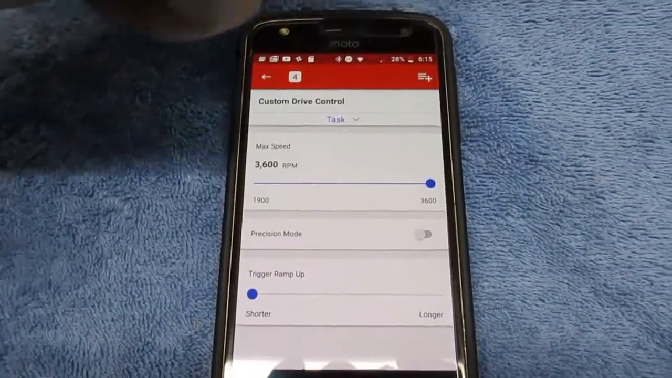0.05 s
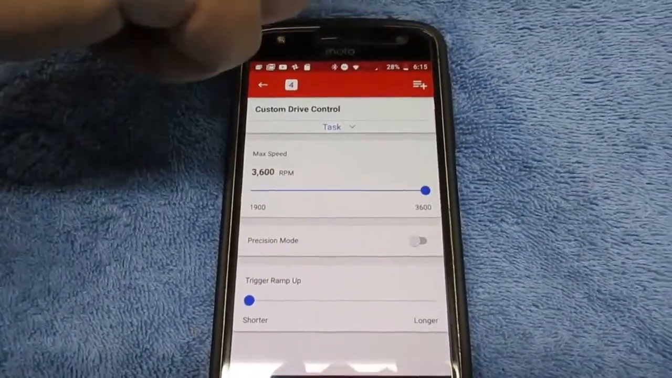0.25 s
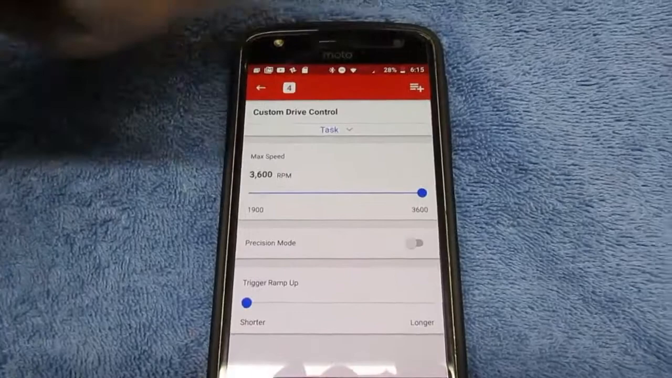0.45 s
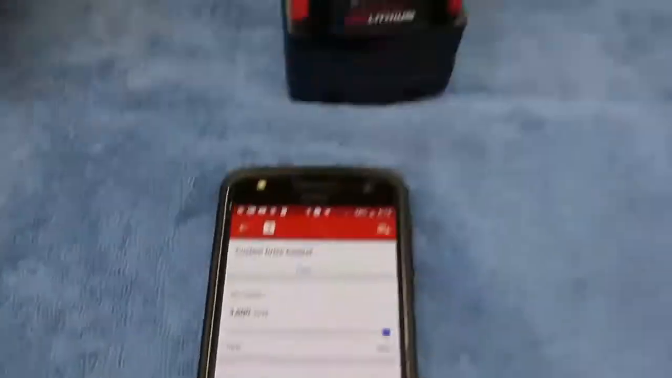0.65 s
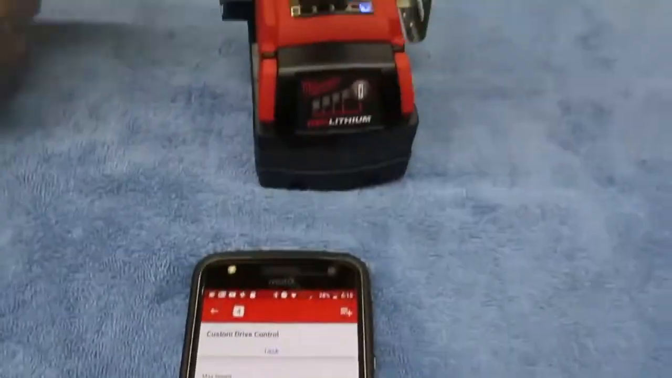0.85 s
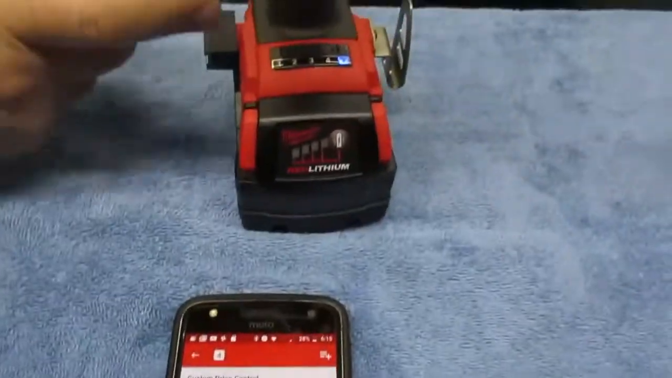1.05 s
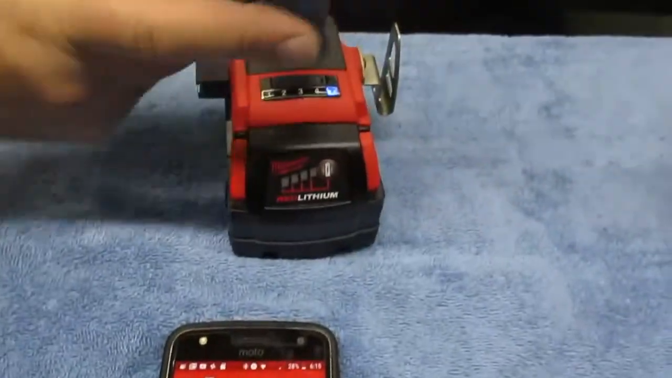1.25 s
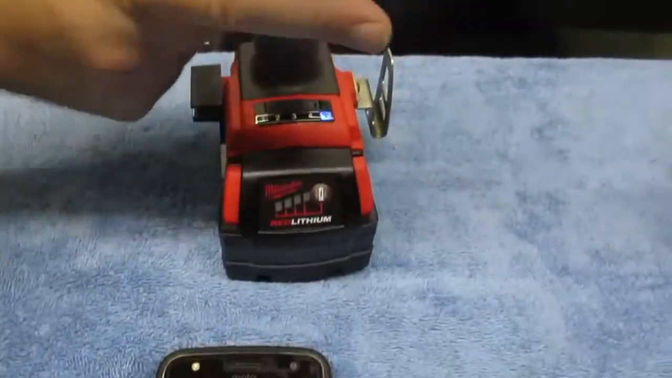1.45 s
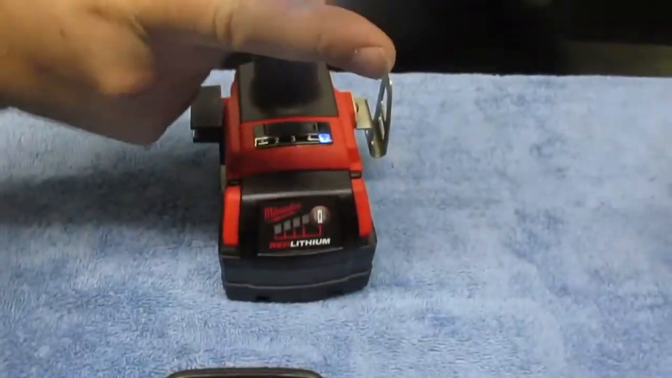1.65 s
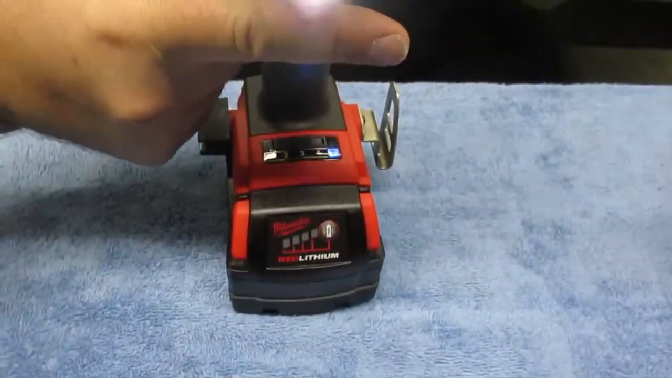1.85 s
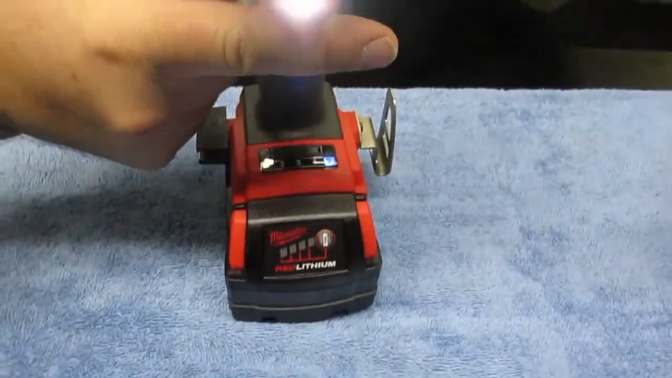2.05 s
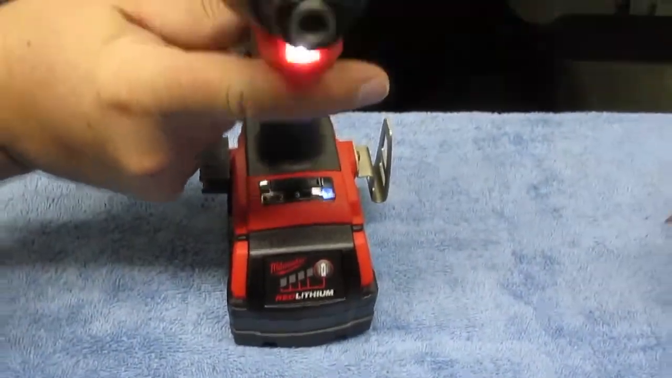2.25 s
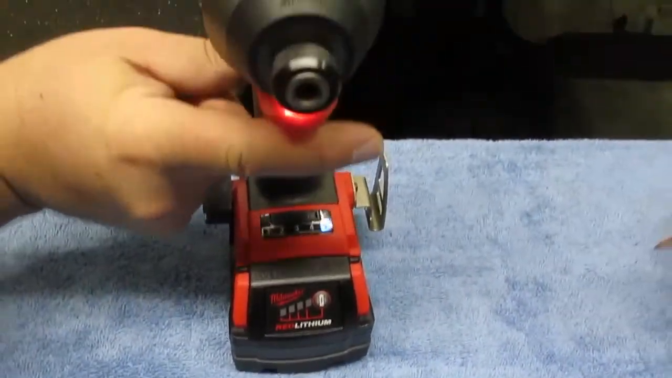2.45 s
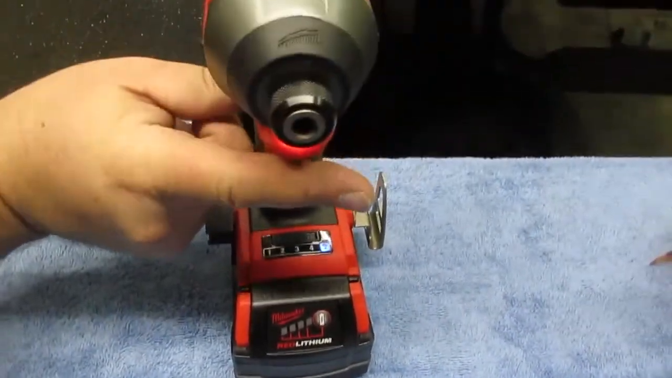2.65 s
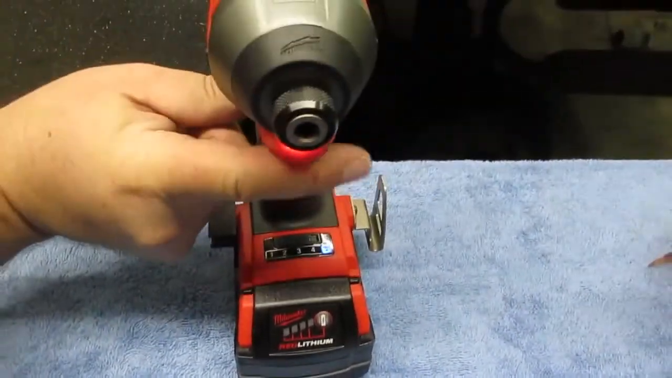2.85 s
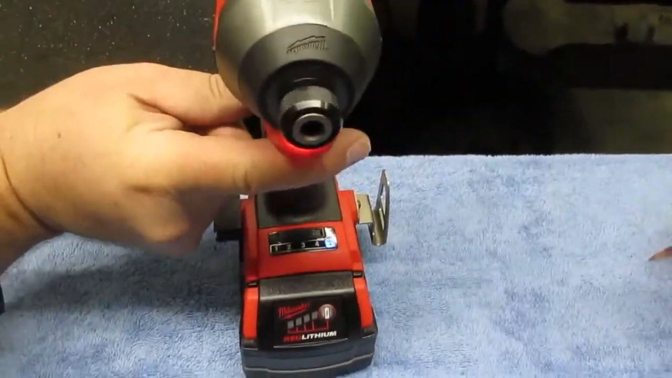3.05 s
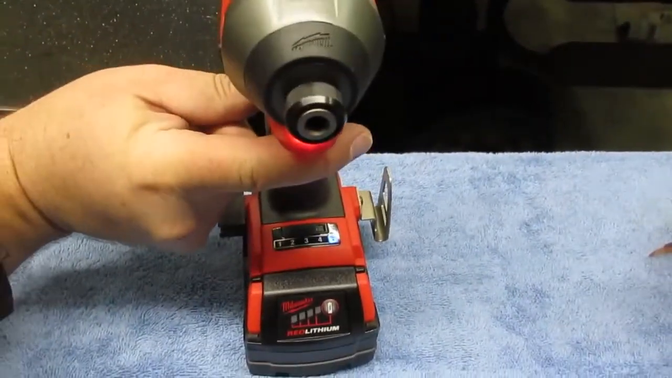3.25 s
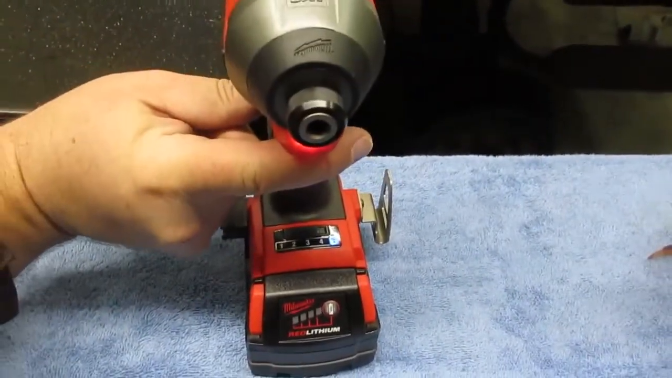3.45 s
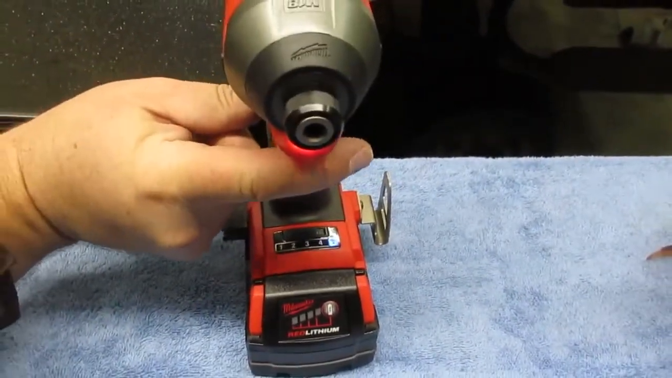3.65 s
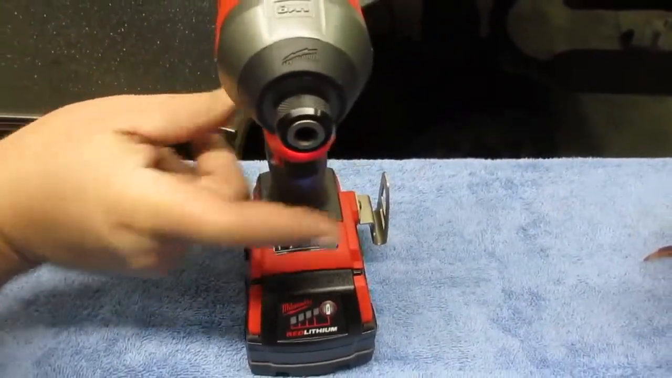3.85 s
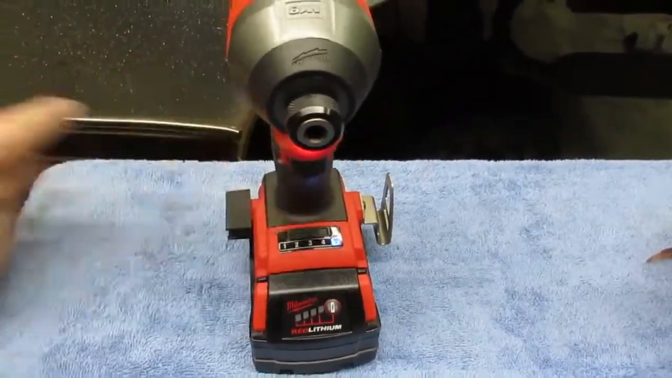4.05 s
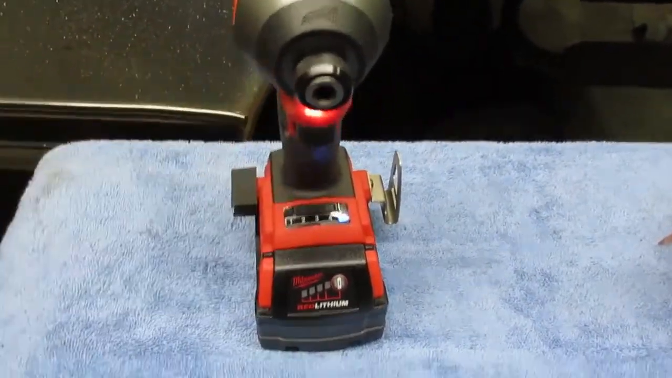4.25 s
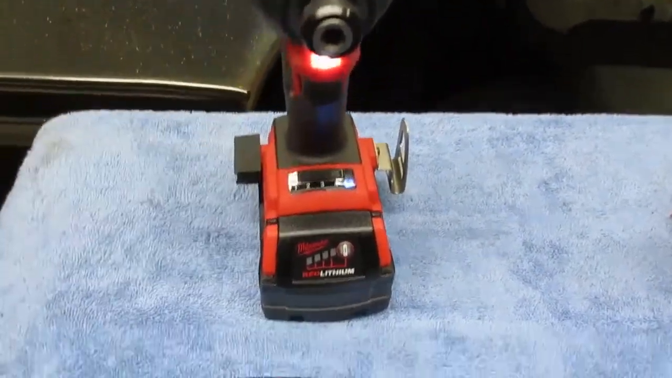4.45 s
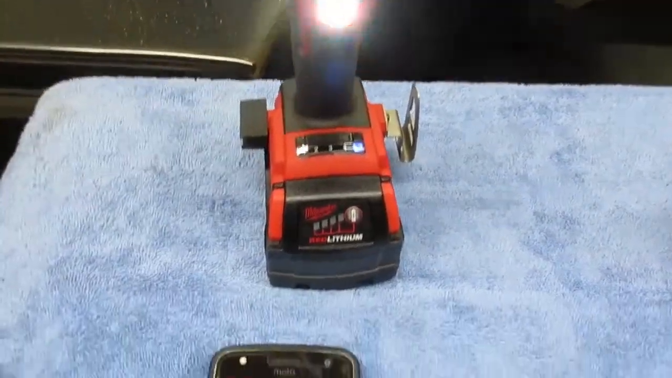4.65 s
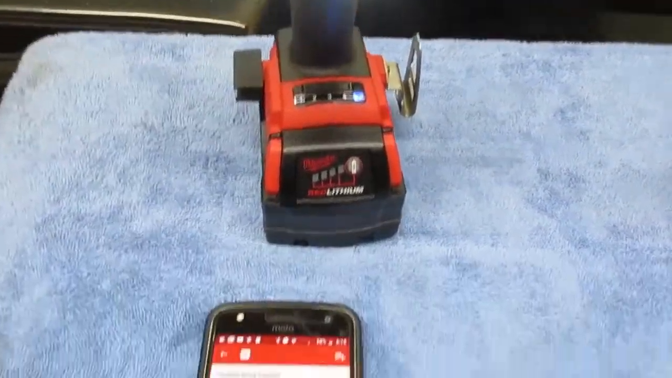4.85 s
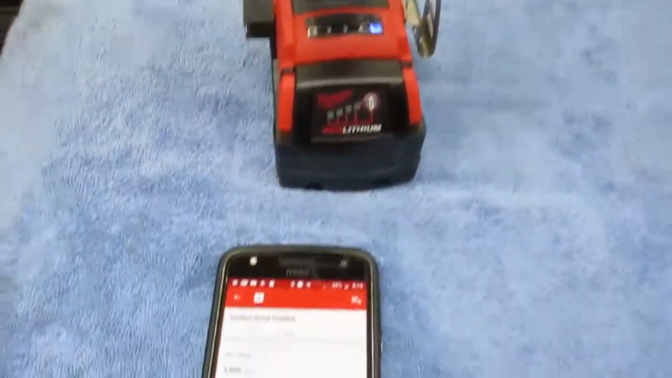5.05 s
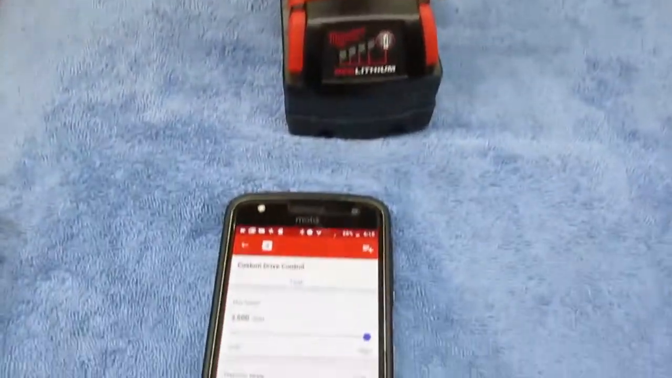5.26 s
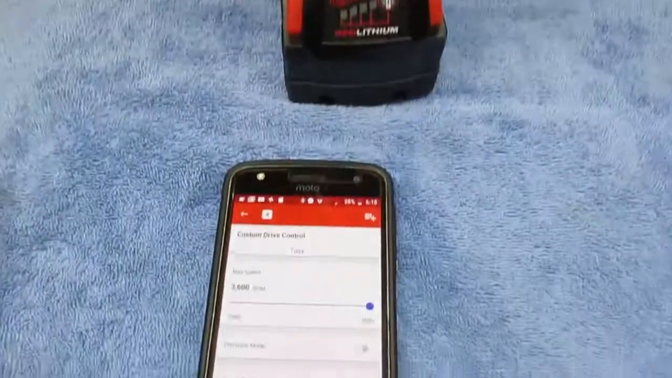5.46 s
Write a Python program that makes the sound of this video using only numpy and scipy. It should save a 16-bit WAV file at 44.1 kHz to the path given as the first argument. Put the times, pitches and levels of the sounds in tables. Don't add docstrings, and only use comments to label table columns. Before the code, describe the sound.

A quiet workshop heard through a close camera microphone: a faint low fan hum around 240 Hz, soft room hush, and tiny rubs of hands or cloth at about 0, 0.2, 0.6 and 1.6 seconds. At 1.86 a trigger tick is followed by a very sharp, loud plastic crack near 1.92. The cordless driver spins up within about 0.15 seconds to a steady high whine near 3 kHz, with gritty gear rattle in plastic and metal shells and rushing air. Released at 2.6, it glides down and stops by 2.75. Lighter clicks at 3.0 to 3.07 start a second run, its spin-up brighter, held until 3.83 and halted by about 3.98. Nothing is driven, so there is no hammering. The background is turned down by the runs and gradually returns, with faint distant drones, a soft low bump at 4.7 and small rubs until 5.6.

```python
import sys
import numpy as np
from scipy import signal
from scipy.fft import rfft, irfft
from scipy.io import wavfile
from scipy.ndimage import uniform_filter1d

SR = 44100
rng = np.random.default_rng(int(sys.argv[2]) if len(sys.argv) > 2 else 0)


def invert_db(level):
    return 10 ** (np.asarray(level, dtype=float) / 20)


def wav_out(sig):
    wavfile.write(sys.argv[1], SR, np.round(np.clip(np.atleast_2d(sig).T, -1, 1) * 32767).astype(np.int16))


N = 242574
TIME = np.arange(N) / SR
FULL_HZ = 410.75
SPINDLE = 0.118
LOCK_AFTER_S = 0.145
DUCK_DB = -10

# pressed_s, released_s, housing_ring_db, gear_case_ring_db, spin_up_extra_whine_db
TRIGGER_PULLS = [
    (1.912, 2.605, -19, -23.5, -2),
    (3.064, 3.832, -21.5, -23.5, 3),
]


def unit(x):
    return x / np.sqrt(np.mean(x ** 2))


def ring(x, hz, width):
    return signal.lfilter(*signal.iirpeak(min(hz, 0.45 * SR), max(hz / width, 0.3), fs=SR), x)


def body(x, modes):
    out = 0
    for k, (hz, width, db) in enumerate(modes):
        mode = unit(ring(ring(x, hz, 1.05 * width), hz, 1.05 * width))
        out = out + invert_db(db) * mode * (-1) ** k
    return unit(out)


def narrow_noise(hz, width):
    return unit(ring(ring(rng.standard_normal(N), hz, width), hz, 2 * width))


def coloured(spectrum):
    hz, db = np.transpose(spectrum)
    f = np.maximum(np.arange(N // 2 + 1) * SR / N, 1)
    colour = invert_db(np.interp(np.log(f), np.log(hz), db))
    return unit(irfft(rfft(rng.standard_normal(N)) * colour, N))


def walk(rate):
    k = int(SR / rate)
    steps = np.repeat(rng.standard_normal(N // k + 1), k)
    return unit(uniform_filter1d(uniform_filter1d(steps, k), k)[:N])


def span(t0, t1, edge):
    return np.clip((TIME - t0) / edge, 0, 1) * np.clip((t1 - TIME) / edge, 0, 1)


def driver():
    # housing_db, gear_case_db, air_db
    driven_loss = (7.1, 3.4, 5.2)
    # housing_db, gear_case_db, air_db
    braked_loss = (5.1, 10.2, 18.6)
    # time_s, aim (-1.4 to 1.4)
    chuck_aim = [(2.03, 0.7), (2.09, -0.7), (2.2, -1.4), (2.4, -0.14), (2.6, 0.45), (3.2, 1.4),
                 (3.45, 0.46), (3.65, 0.4), (3.85, 0.69)]
    hz, on, braking, levels = rotor()
    turn = 2 * np.pi * np.cumsum(hz) / SR
    slow = 1 - np.clip(hz / FULL_HZ, 0, 1)
    halvings = np.minimum(np.log2(FULL_HZ / hz), 2.4)
    loss = np.outer(driven_loss, 1 - braking) + np.outer(braked_loss, braking)
    housing_db, case_db = levels[:2] - loss[:2] * halvings
    air_db = -20 - loss[2] * halvings
    effort_db = levels[2] * (1 - braking) * np.minimum(12 * halvings, 1)
    aim = np.interp(TIME, *np.transpose(chuck_aim))

    beat = gear_beat(turn, slow)
    rattle = gear_rattle(beat, housing_db, case_db + 0.8 * effort_db * slow)
    hiss = air_hiss(beat, air_db)
    whine = tooth_whine(turn, slow, aim) + pole_whine(hz, turn, slow, braking, effort_db)
    whine = whine + flares(hz, turn, braking, effort_db) + weak_orders(hz, turn, slow)
    whine = whine + unbalance(hz, turn, slow)
    return on * invert_db(camera_db() - DUCK_DB) * (rattle + hiss + np.sqrt(2) * whine)


def rotor():
    spin_up_s, settle_s = 0.065, 0.14
    coast_hz_per_s, brake_after_s, brake_hz_per_s2 = 690, 0.066, 27500
    hz, on, braking, levels = np.zeros(N), np.zeros(N), np.zeros(N), np.zeros((3, N))
    for pressed, released, *db in TRIGGER_PULLS:
        age, since = np.maximum(TIME - pressed, 0), np.maximum(TIME - released, 0)
        up = FULL_HZ * (1 - np.exp(-age / spin_up_s - (age / settle_s) ** 2))
        down = coast_hz_per_s * since + brake_hz_per_s2 * np.maximum(since - brake_after_s, 0) ** 2
        hz += np.maximum(up - down, 0)
        start = np.clip((TIME - pressed) / 0.002 + 0.5, 0, 1)
        on += start * np.exp(-np.maximum(since - LOCK_AFTER_S, 0) / 0.0092)
        braking += np.clip(since / 0.044, 0, 1) * (up > down)
        levels[:, TIME >= pressed - 0.01] = np.array(db)[:, None]
    return np.maximum(hz, 30), on, braking, levels


def gear_beat(turn, slow):
    planet = 0.074
    wobble = sum(np.cos(k * share * turn) for share in (SPINDLE, planet) for k in (1, 2))
    return invert_db(8.5 * slow * np.cos(turn) + 0.91 * wobble + 0.574 * walk(150))


def gear_rattle(beat, housing_db, case_db):
    # pitch_hz, width_hz, level_db
    housing_modes = [(1550, 150, -3.5), (1680, 136, 2), (1810, 63, 1), (1855, 117, -0.5),
                     (2074, 170, -11.5), (1250, 120, -13), (832, 230, -12.5)]
    # pitch_hz, width_hz, level_db
    case_modes = [(2988, 970, 2.5), (3545, 214, -6), (3653, 270, -6.5), (5050, 990, -7.5)]
    knocks = rng.standard_normal(N) * invert_db(2.66 * rng.exponential(size=N)) * beat
    knocks = unit(knocks) + 0.54 * rng.standard_normal(N)
    housing = invert_db(housing_db + 2 * walk(30)) * body(knocks, housing_modes)
    case = invert_db(case_db + 1.5 * walk(60)) * body(knocks, case_modes)
    return housing + case


def air_hiss(beat, air_db):
    # pitch_hz, level_db (per Hz)
    air_colour = [(290, -34.5), (500, -22), (1380, -10), (1660, -9), (2270, -10.5), (3070, -21.5),
                  (3340, -9.5), (4320, -13), (5210, -13.5), (5920, -16), (8580, -14), (15200, -27.5)]
    return invert_db(air_db) * coloured(air_colour) * invert_db(0.25 * walk(200)) * np.sqrt(beat)


def tooth_whine(turn, slow, aim):
    octave_db = -44 - 90 * slow ** 2 - 5.5 * aim
    octave = invert_db(octave_db + 1.2 * walk(40)) * np.sin(26 * turn + 0.5 * walk(20))
    tooth_db = -32.5 - 200.5 * slow ** 2 + 5.5 * aim
    tooth = invert_db(tooth_db + 1.5 * walk(40)) * np.sin(13 * turn + 0.25 * walk(20))
    return octave + tooth * (slow < 0.2)


def pole_whine(hz, turn, slow, braking, effort_db):
    # multiple of rotor speed, level_db on the gear-case ring, braking_loss_db
    pole_line = (8, -18.5, 8.1)
    # pitch_hz, gain_db
    shell_path = [(300, -60), (1300, -36), (1720, -11), (2250, -35), (2700, -18), (2880, -2), (3120, 0),
                  (3290, -4.5)]
    order, db, braked_db = pole_line
    path_db = np.interp(order * hz, *np.transpose(shell_path))
    pole_db = db + path_db - braked_db * braking + effort_db
    return invert_db(pole_db + (1.3 + 7 * slow) * walk(40)) * np.sin(order * turn + 0.25 * walk(20))


def flares(hz, turn, braking, effort_db):
    # multiple of rotor speed, ring_hz, width_hz, level_db, braking_loss_db
    ring_crossings = [(13, 2980, 270, -17, 4), (6.277, 1740, 150, -21, 3), (21, 3000, 300, -27, 15),
                      (16.82, 3000, 300, -25, 15), (11, 3050, 250, -25, 15)]
    out = 0
    for order, ring_hz, width, db, braked_db in ring_crossings:
        crossing = np.exp(-((order * hz - ring_hz) / width) ** 2)
        flare_db = db - braked_db * braking + effort_db + 2.5 * (1 - braking) * walk(250)
        jitter = (0.7 - 0.5 * braking) * walk(200)
        out = out + invert_db(flare_db) * crossing * np.sin(order * turn + jitter)
    return out


def weak_orders(hz, turn, slow):
    line_orders = (.882, 2, 3, 4, 4.52, 5, 6.277, 12.55, 16.82, 21, 36)
    line_levels = (-56, -50, -48, -27, -29, -43, -41, -41, -48, -47, -52)
    out = 0
    for order, db in zip(line_orders, line_levels):
        glide_db = shell(order * hz) - shell(order * FULL_HZ) - 40 * slow
        out = out + invert_db(db + glide_db + 2.5 * walk(30)) * np.sin(order * turn + 0.45 * walk(20))
    return out


def shell(hz):
    # pitch_hz, gain_db
    shell_gain = [(100, -50), (1300, -36), (1600, -22), (2500, -22), (2800, 3), (3000, 7), (3300, 0.1),
                  (4300, -3), (15000, 0.1)]
    return np.interp(hz, *np.transpose(shell_gain))


def unbalance(hz, turn, slow):
    # pitch_hz, width_hz, level_db
    grip_mode = (378, 16, -47)
    grip_hz, width, grip_db = grip_mode
    grip = invert_db(grip_db) * np.sin(turn) / (1 + ((hz - grip_hz) / width) ** 2)
    chuck = SPINDLE * turn
    chuck_wave = np.sin(chuck) + 0.087 * np.sin(2 * chuck) + 0.29 * np.sin(3 * chuck)
    return grip + invert_db(-51 - 35 * slow) * chuck_wave


def trigger():
    # time_s, peak_db, ring_hz, ring_s, thump_db (relative)
    clicks = [
        (1.8606, -14, 5200, .024, -16),
        (1.9127, -3, 6500, .02, -12),
        (1.9208, 4.5, 9500, .012, -20),
        (2.989, -41, 9000, .012, -15),
        (3.0098, -25, 5500, .018, -28),
        (3.0575, -32, 9000, .01, -6),
        (3.0633, -10, 10000, .012, -12),
        (3.0706, -8, 11000, .012, -14),
    ]
    out, t = np.zeros(N), np.arange(SR // 20) / SR
    for s, db, hz, ring_s, thump_db in clicks:
        strike = rng.standard_normal(len(t)) + 5 * (t == t[2])
        decay = np.exp(-t / 0.00022) + 0.14 * invert_db(-60 * t / ring_s)
        crack = ring(ring(strike, hz, 1.2 * hz), hz, 1.2 * hz) * decay
        crack = signal.lfilter(*signal.butter(4, 12000, fs=SR), crack)
        thump = np.sin(2 * np.pi * 1700 * t) * np.exp(-t / 0.00087)
        thump = thump + 1.2 * np.sin(2 * np.pi * 3000 * t) * np.exp(-t / 0.0015)
        i = int(s * SR)
        out[i:i + len(t)] += invert_db(db) * (crack / np.abs(crack).max() + invert_db(thump_db) * thump)
    return out


def chopper():
    # start_s, end_s, pitch_hz, level_db
    chopper_tones = [
        (1.8995, 1.93, 7950, -42),
        (3.049, 3.08, 7950, -46),
    ]
    out = 0
    for t0, t1, hz, db in chopper_tones:
        out = out + invert_db(db) * span(t0, t1, 0.0011) * np.sin(2 * np.pi * hz * TIME)
    return out


def room(x):
    t60_s, tail_db = 0.18, -20
    t = np.arange(SR // 2) / SR
    tail = ring(rng.standard_normal(len(t)), 3500, 7700) * invert_db(-60 * t / t60_s) * (t > 0.004)
    return x + invert_db(tail_db) * signal.fftconvolve(x, tail / np.sqrt(np.sum(tail ** 2)))[:N]


def hands():
    # time_s, peak_db, pitch_hz, length_s
    touches = [(0, -49, 6500, .03), (.178, -46, 4400, .014), (.64, -50.5, 5800, .016),
               (1.63, -52, 4200, .018), (1.868, -50, 7000, .015), (4.255, -59, 9000, .012),
               (4.68, -42, 85, .03), (4.12, -64, 8000, .01), (4.64, -63, 5500, .02),
               (4.835, -58, 10000, .07), (5.245, -60, 6000, .03)]
    out = 0
    for s, db, hz, length in touches:
        age = np.maximum(TIME - s, 0) / length
        scrape = unit(ring(ring(rng.standard_normal(N), hz, 0.6 * hz), hz, 0.8 * hz))
        out = out + invert_db(db + 2.5 * walk(120)) * np.minimum(5 * age, 1) * np.exp(-age) * scrape
    return out


def shop():
    # pitch_hz, width_hz, level_db
    fan_modes = [(240.1, 13.6, -37), (311, 24, -47.5), (171.6, 71, -51), (389, 71, -51), (54, 11, -64.5),
                 (768, 194, -56)]
    # pitch_hz, level_db (per Hz)
    hush_colour = [(18, -72), (30, -26), (81, -23.5), (176, -17), (212, -12.5), (241, -5.5), (439, -15.5),
                   (759, -13.5), (911, -19.5), (1840, -22.5), (4710, -37), (10300, -42), (15200, -52)]
    hum = sum(invert_db(db) * narrow_noise(hz, width) for hz, width, db in fan_modes)
    hush = invert_db(-40 + 0.66 * walk(15)) * coloured(hush_colour)
    return (hum + hush) * invert_db(camera_db())


def far_machines():
    # start_s, end_s, pitch_hz, width_hz, level_db
    far_drones = [
        (0, .35, 450, 25, -53),
        (.9, 1.45, 3300, 200, -60),
        (4.07, 4.45, 442, 10, -55),
        (5.41, 5.6, 445, 10, -49),
        (5.06, 5.11, 13700, 500, -76),
        (5.15, 5.25, 13600, 500, -76),
    ]
    out = 0
    for t0, t1, hz, width, db in far_drones:
        out = out + invert_db(db) * span(t0 - 0.02, t1, 0.012) * narrow_noise(hz, width)
    return out


def camera_db():
    rest_db, duck_s, recover_s = 0.62, 0.054, 2.5
    db = np.full(N, rest_db)
    for pressed, released, *_ in TRIGGER_PULLS:
        moves = (pressed, DUCK_DB, duck_s), (released + LOCK_AFTER_S, rest_db, recover_s)
        for start, goal, tau in moves:
            i = int(start * SR)
            db[i:] = goal + (db[i] - goal) * np.exp(-(TIME[i:] - start) / tau)
    return db


def scene():
    tool = room(driver() + trigger() + chopper())
    return (tool + hands() + shop() + far_machines())[None]


def roll_off(x):
    return signal.sosfilt(signal.butter(12, 16340, fs=SR, output="sos"), x)


def record(dry):
    hiss_hz, hiss_db, top_hz = 10840, -80, 15020
    noisy = dry + invert_db(hiss_db) * unit(ring(rng.standard_normal(N), hiss_hz, hiss_hz))
    top_cut = signal.ellip(12, 0.3, 60, top_hz, fs=SR, output="sos")
    mix = np.clip(signal.sosfilt(top_cut, noisy), -1, 1)
    return roll_off(mix)


dry = scene()
out = record(dry)
wav_out(out)
```